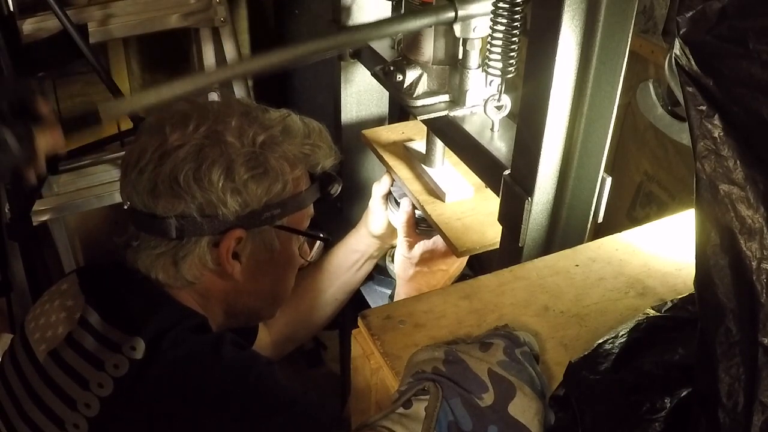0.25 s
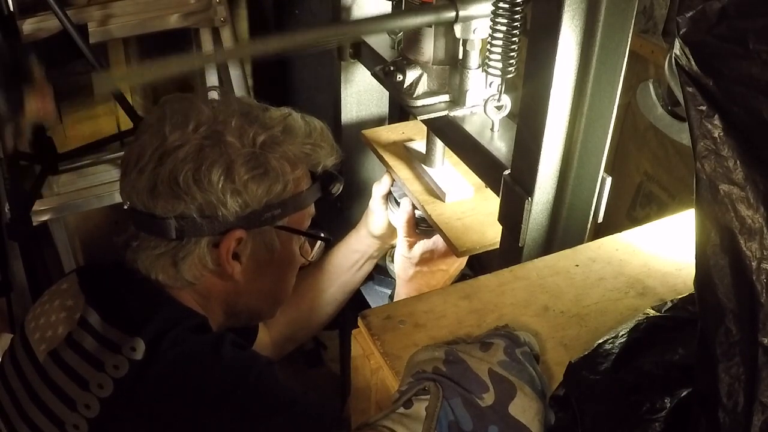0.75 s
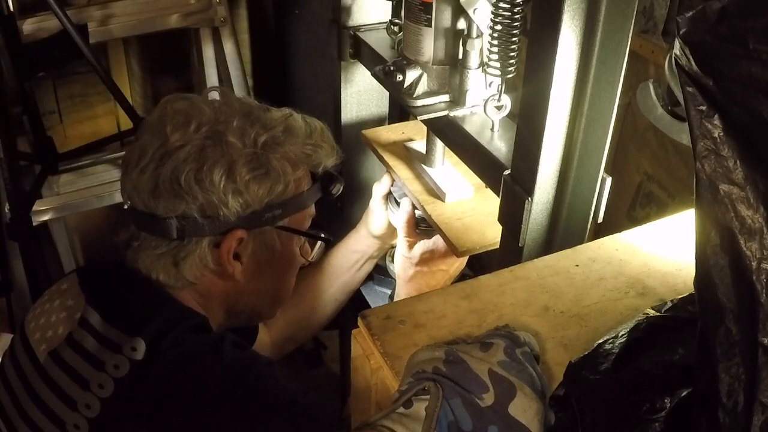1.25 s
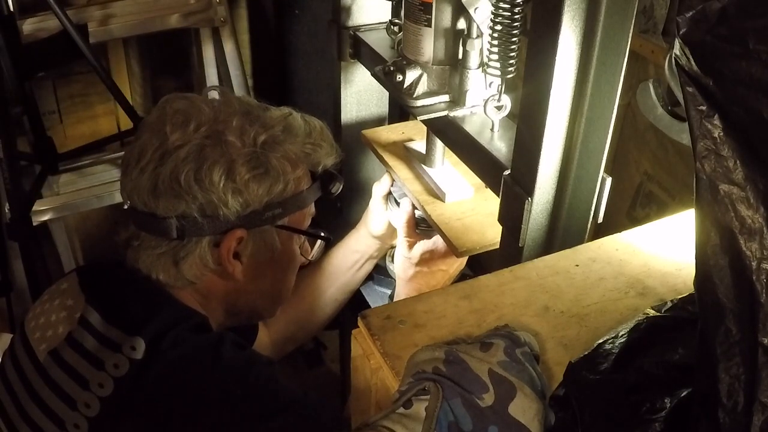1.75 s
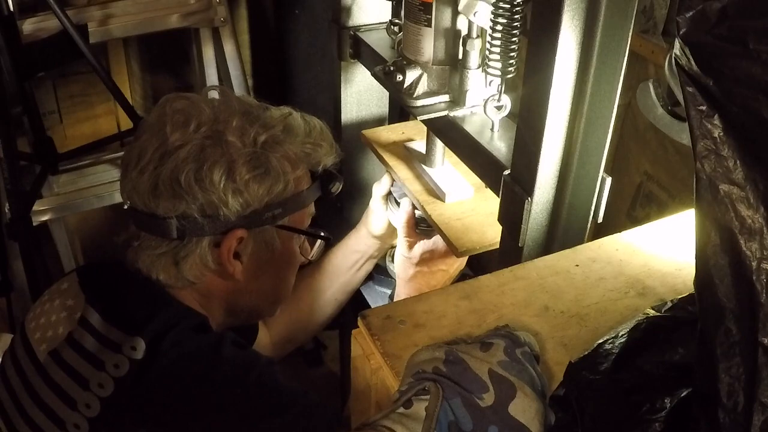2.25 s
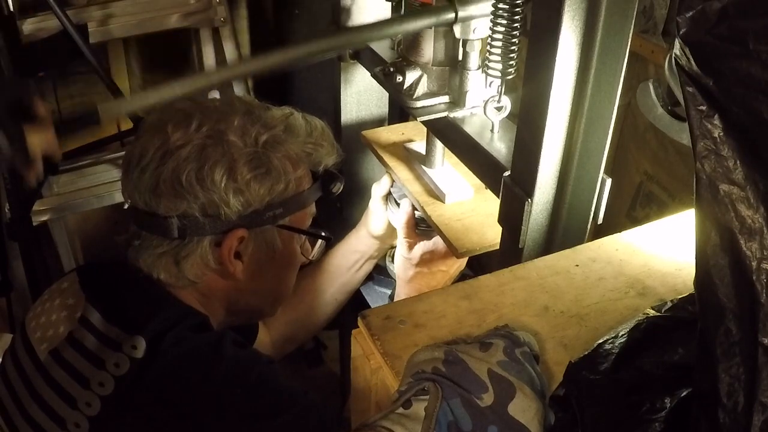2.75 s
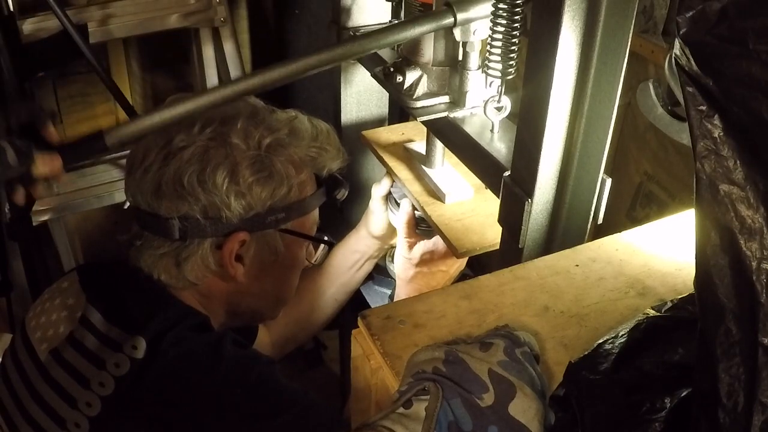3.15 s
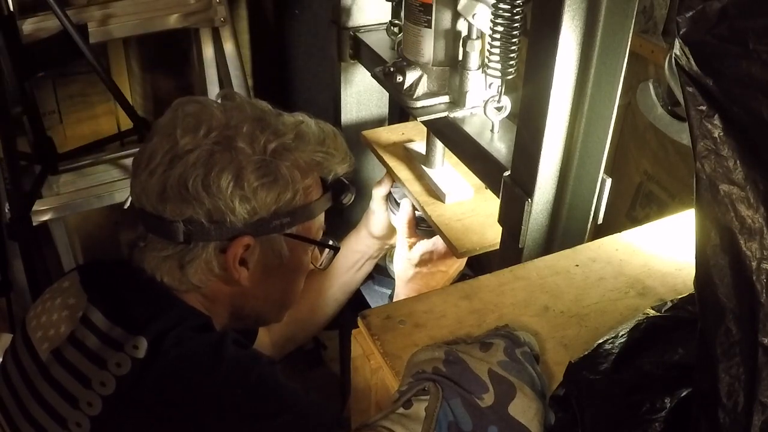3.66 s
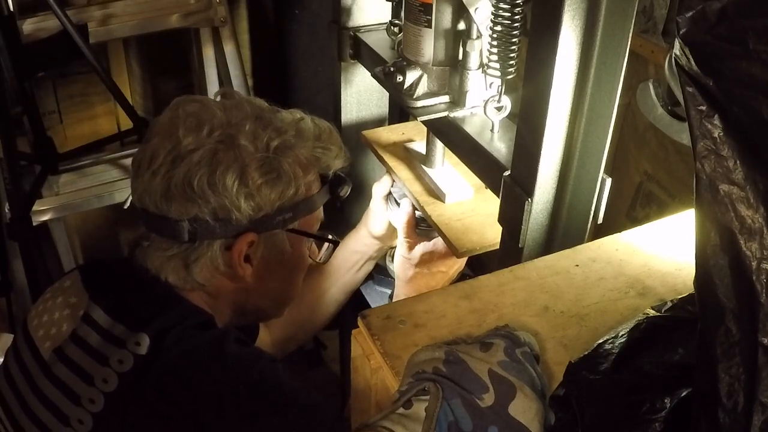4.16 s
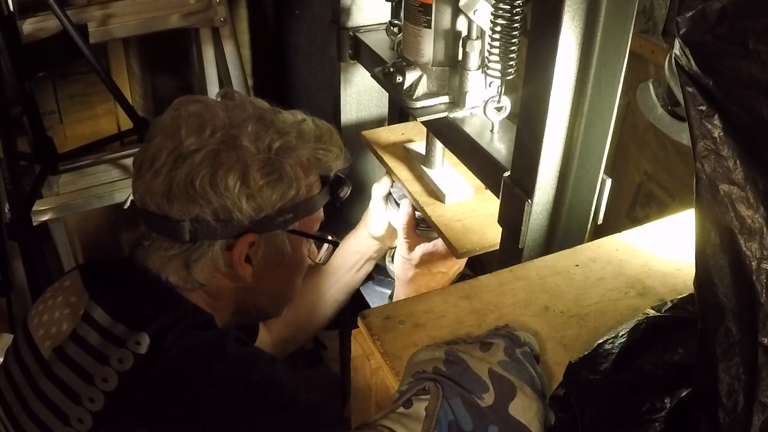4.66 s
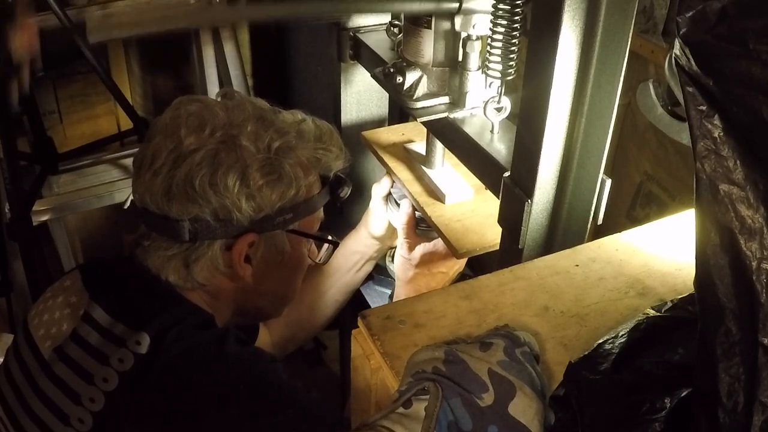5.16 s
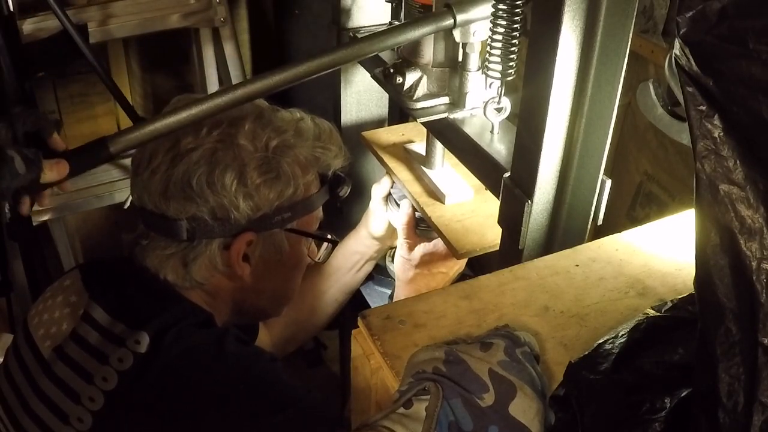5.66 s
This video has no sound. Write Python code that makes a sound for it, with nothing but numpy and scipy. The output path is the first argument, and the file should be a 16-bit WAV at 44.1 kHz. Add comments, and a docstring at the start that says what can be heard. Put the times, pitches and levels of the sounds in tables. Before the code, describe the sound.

Close, slightly boxy sound of a hand-pumped steel press in a quiet workshop, over a steady soft low hum and faint wide hiss. From 0 to 0.2 s comes the end of a stroke: four quick knocks, bright then dull, about 15 per second, and a knock with a low thump near 0.27 s. Light metal clinks cluster at 0.6-0.75 s, with faint taps from 1.2 to 1.7 s. Small knocks and weak thumps at 1.84 and 1.97 s lead into a run of eight double knocks, 2.24-2.75 s, closed by a dull thump at 2.79 s. Bright clinks follow at 3.15-3.3 s, then sparse quiet taps until 4.4 s. A firm knock at 4.72 s starts the loudest run, 4.76-5.25 s, hard and ringing briefly, ending in a sharp knock and the deepest thump at 5.31 s. Last clinks fall at 5.7-5.85 s. Echo is short, dull and faint.

```python
"""Dull and bright knocks in quick runs, low thumps and light clinks stand over a soft workshop background.
They come from a hand-pumped hydraulic press, heard through a boxed-in microphone close to the frame.
On each down stroke the loaded ram sticks and slips, knocking through the steel frame, and the handle lands
on its stop with a low thump; on the way up the loose handle and linkage clink, with small dull knocks.
Short pushes ring steel modes and bands of dying noise; filtered noise makes the background and echo."""
import sys
import numpy as np
from scipy import signal
from scipy.fft import rfft, irfft
from scipy.io import wavfile

SR = 44100
rng = np.random.default_rng(int(sys.argv[2]) if len(sys.argv) > 2 else 0)


def log_audio(samples):
    """Write samples as a 16-bit WAV file to the path given in sys.argv[1]."""
    # one column per channel
    frames = np.atleast_2d(samples).T
    # limit to full scale, then quantise
    limited = np.clip(frames, -1, 1)
    pcm = np.round(limited * 32767).astype(np.int16)
    wavfile.write(sys.argv[1], SR, pcm)


N = 260631

# Contact times below hold near 1100 Hz; strike() keeps them within 0.3 to 12 ms.
# background of the shop: (frequency [Hz], relative density [dB per Hz])
BACKGROUND_SPECTRUM = [(12, 6.5), (20, 4), (38, -8), (77, 2), (150, -15.5), (285, -18), (377, -16.5),
                       (472, -14.5), (780, -16), (849, -6.5), (1030, -42), (1290, -30), (1610, -23),
                       (13900, -26), (16000, -29)]
# resonances of background and echo: (frequency [Hz], width [Hz], level [dB])
BOXY_RESONANCES = [(290, 100, 2), (455.6, 18, -1.5), (618, 3.3, -5.5), (886, 12, -8), (1138, 65, 0),
                   (1233, 6.8, -3.5), (1301.4, 28, -2), (1445, 24, -20.5), (990, 130, -13)]
# noise of opposite sign in the two channels: (frequency [Hz], relative density [dB per Hz])
SIDE_SPECTRUM = [(12, -9), (20, 21), (38, -1), (499, -21.5), (607, -15), (802, -31), (1810, -23),
                 (12100, -21.5), (16000, -61)]
# bright slips of the loaded ram: (time [s], treble drive [dB])
SLIPS = [(0.0014, -57), (0.0539, -49.5), (0.1126, -61.5), (0.181, -63), (2.2421, -49.5), (2.3216, -57),
         (2.387, -49.5), (2.4488, -41.5), (2.5143, -41), (2.5816, -55), (2.652, -59), (2.7249, -53.5),
         (4.756, -54), (4.8769, -46), (4.9441, -42), (5.001, -36.5), (5.0575, -34.5), (5.1105, -35.5),
         (5.1681, -38.5), (5.235, -45.5)]
# the dull catch that ends each slip: (time [s], middle drive [dB])
CATCHES = [(0.02, -38), (0.0776, -40.5), (0.1402, -43.5), (0.2075, -45.5), (2.2745, -41), (2.3497, -43),
           (2.4115, -45), (2.474, -40.5), (2.5375, -42), (2.604, -42), (2.6798, -43.5), (2.7544, -44),
           (4.8048, -40.5), (4.9027, -38.5), (4.9642, -41), (5.0228, -34), (5.0779, -32), (5.1295, -34),
           (5.1835, -38.5), (5.255, -46)]
# lone knocks as the handle takes up play, takes load or stops:
# (time [s], treble drive [dB], middle above treble [dB], top above treble [dB], contact [ms])
KNOCKS = [(0.2636, -53.5, -4, -3.5, 5.5), (1.8261, -69.5, 13, -23, 1.1), (1.8429, -58, 4, -35, 2.5),
          (1.9708, -51, 10.5, -13, 1.7), (2.1321, -71, 18.5, -4, 2.8), (2.187, -61.5, 21.5, -2, 2.7),
          (2.775, -56.5, 7.5, -1, 5.7), (3.0259, -82.5, 7, -30, 8.4), (3.7701, -75, 2, -20, 2.3),
          (3.8363, -76, 5, -20, 6), (4.399, -68.5, 13.5, -43, 3.4), (4.7159, -39.5, 4.5, -3, 2.65),
          (5.3084, -39.5, -4.5, -18, 1.16)]
# modes rung by each knock, mostly of the steel frame; the strong short ring near 1.3 kHz is the boxed-in
# microphone's own: (frequency [Hz], level [dB], t60 [s])
FRAME_MODES = [(273.4, -10, 0.33), (324.3, -4.5, 0.24), (455, -3.5, 0.061), (589, -2, 0.049),
               (669, -13.5, 0.29), (760, 5.5, 0.028), (882.6, 1.5, 0.095), (1117, -5, 0.15),
               (1232, -4.5, 0.064), (1309.6, 12, 0.038), (1330, -14.5, 0.2), (1324, -16, 0.38),
               (1372, 9.5, 0.032), (1448, -6, 0.11), (1633, -2, 0.075), (2306, -13.5, 0.12),
               (2510, -9, 0.17), (2684, -12.5, 0.19), (3224, -14.5, 0.15), (3485, -9, 0.14),
               (3930, -12.5, 0.055), (4190, -11.5, 0.093), (4260, -17.5, 0.069), (4700, -11.5, 0.098),
               (6110, 0, 0.011), (3087, 5, 0.011), (5000, 0, 0.015), (1519, 6, .025), (7040, -27, 0.21)]
# bands of dying noise after each knock, with one long faint band near 1.1 kHz:
# (frequency [Hz], width [Hz], level [dB], t60 [s])
KNOCK_WASH = [(278.6, 140, -9.5, 0.27), (564, 386, 0.5, 0.11), (847.4, 70, -3, 0.088),
              (1280, 220, -19, 0.27), (1106, 570, -31.5, 1.5), (1900, 550, -10, 0.2),
              (2170, 300, -20, 0.088), (2670, 300, -10.5, 0.12), (3310, 440, -10, 0.13),
              (4120, 680, -11.5, 0.16), (4900, 550, -12.5, .1), (6080, 610, -9.5, 0.12),
              (7700, 340, -14.5, 0.057), (9400, 2600, -10.5, 0.076), (13400, 3600, -13.5, 0.13)]
# the press rocks when the handle takes load or meets its stop: (time [s], drive [dB])
THUMPS = [(0.277, -55), (1.841, -58.5), (1.972, -60.5), (2.788, -53), (4.72, -62.5), (5.32, -48)]
# lowest modes of the whole press: (frequency [Hz], level [dB], t60 [s])
THUMP_MODES = [(89.2, -0.5, 0.77), (35, -19, .2), (110, -1, 0.32), (69.6, -29, 0.38)]
# clinks and small dull knocks of handle and linkage: (time [s], treble drive [dB],
# middle above treble [dB], contact [ms], favoured mode [Hz], gain of that mode [dB])
LINKAGE_TOUCHES = [(0.598, -68.5, 11.5, 5.3, 2480, 17), (0.62, -65, 16, 3, 2550, 26),
                   (.625, -53.5, -28, 1.3, 10630, 16), (0.698, -48.5, -6, 4.5, 6185, 25),
                   (.712, -62, 17, 7.4, 11600, 10), (.753, -47, 6.5, .83, 7720, 14),
                   (1.2008, -76, 13, 1.8, 480, 12.5), (1.265, -69.5, 12.5, 6.2, 484, 5.5),
                   (1.389, -80, -17, 3, 9110, 27), (1.599, -71.5, 20, 1.4, 2260, 26),
                   (1.641, -61.5, -5, 2.8, 8850, -4), (1.661, -63, 11, 4.4, 482, 9),
                   (1.695, -60, -5, 5, 3700, 29), (1.861, -78, 25, 4.9, 1135, 22),
                   (3.140, -62.5, 9.5, 8.4, 5000, 15), (3.149, -66, -6, 1.6, 10140, 39),
                   (3.213, -54, 4, 2.3, 6100, -6), (3.222, -50.5, 4.5, 4, 13700, 12),
                   (3.264, -56, 13.5, 1.4, 12100, 11), (3.290, -62, 0.5, 9.4, 10400, 10),
                   (3.846, -82.5, 17.5, 6.8, 480, 11.5), (3.974, -79.5, -21, 4, 8830, 20),
                   (4.072, -92, 13.5, 20, 700, 13), (4.181, -72, 24, 1.1, 2240, 15),
                   (4.241, -55, 10.5, 0.95, 2250, 21), (4.257, -74, 3, 5.9, 590, 26),
                   (4.276, -60.5, 2, 5.3, 2260, 17), (4.412, -75.5, 20.5, 8.6, 700, 18),
                   (5.316, -48.5, -13, 1.5, 1855, 25.5), (5.681, -69, 16, 4.4, 4123, 31),
                   (5.764, -52, 0, 7.3, 14500, 20), (5.798, -48, 3.5, 1.1, 870, 15.5),
                   (5.825, -58, 15.5, 0.72, 850, -4), (5.842, -63, -17, 8.4, 10500, 8)]
# modes of handle and pins: (frequency [Hz], level [dB], t60 [s])
LINKAGE_MODES = [(478.7, -1.5, 0.083), (592.3, -11.5, 0.32), (681.6, -8, 0.14), (880, -15, 0.27),
                 (1150, -30.5, 0.46), (1290, 3, 0.034), (1860, -32.5, 0.82), (2315, -5.5, 0.029),
                 (2528, -13.5, 0.13), (3750, -15.5, 0.054), (3987, -3.5, 0.037), (4900, -2, 0.029),
                 (5990, -5, 0.022), (7000, -20, 0.15), (7990, -5.5, 0.028), (8840, -1.5, 0.035),
                 (10480, -10.5, 0.046), (11600, -13, 0.077), (13700, -6, 0.042), (14600, -30, 0.033)]
# bands of dying noise after each touch: (frequency [Hz], width [Hz], level [dB], t60 [s])
LINKAGE_WASH = [(269, 61, -13, 0.24), (594, 154, -12, 0.24), (940, 560, -11, 0.28), (1368, 150, -12, 0.13),
                (2270, 2370, -3.5, 0.1), (3610, 2700, -6.5, 0.12), (5800, 2200, -2.5, 0.045),
                (7500, 14500, -7, 0.15), (11200, 3700, -8, 0.11), (14100, 1000, -12.5, 0.065)]
# centres of bass, middle, treble and top: (frequency [Hz])
COLOUR_HZ = [350, 1100, 4000, 11000]

BACKGROUND_DB, BOXY_HUM_DB, SIDE_DB = -70.5, -75, -75
SHOP_T60_S, SHOP_DB, SHOP_CUT_HZ, SHOP_BOXY_DB = 1, -24, 5100, -1.5
# a band follows the tabled one: (level [dB] when that stands at the pivot, share of its swing)
PIVOT_DB = -45
SLIP_BASS, SLIP_MIDDLE, SLIP_TOP_DB, SLIP_MS = (-50, 0.6), (-48.5, 0.13), -22.5, 1
CATCH_BASS, CATCH_TREBLE, CATCH_TOP_DB, CATCH_MS = (-50, 0.091), (-59.5, 1), -21, 1.82
# bass above treble, rising with middle and contact
KNOCK_BASS_DB, KNOCK_BASS_SHARE, KNOCK_BASS_DB_PER_MS = 0.5, 0.48, 1.3
# bass against middle: longer touches push the low modes more
TOUCH_BASS_DB, TOUCH_BASS_DB_PER_MS = -13.5, 1.88
# top above treble when the favoured mode is at 5 kHz; higher touches are brighter
TOUCH_TOP_DB, TOUCH_TOP_DB_PER_OCTAVE = -7, 10
PUSH_SAMPLES = 1024
MICROPHONE_STOP_HZ = 16016   # 60 dB down from here up


def from_db(db):
    """Decibels to gain."""
    return 10 ** (np.asarray(db) / 20)


def rms_one(x):
    """Scale to unit rms."""
    return x / np.sqrt(np.mean(x ** 2) + 1e-20)


def at_hz(hz, points_hz, values):
    """Read a table on a log-frequency axis."""
    return np.interp(np.log(hz), np.log(points_hz), values)


def coloured(spectrum):
    """Steady noise with the given spectrum, rms 1."""
    hz = np.maximum(np.fft.rfftfreq(N, 1 / SR), 1)
    gain = from_db(at_hz(hz, *np.transpose(spectrum)))
    white = rng.standard_normal(N)
    return rms_one(irfft(rfft(white) * gain, N))


def ring(force, hz, t60):
    """A damped mode: a unit click sets a sine of height 1 ringing, down 60 dB after t60."""
    radius = from_db(-60 / (t60 * SR))
    angle = 2 * np.pi * hz / SR
    return signal.lfilter([0, np.sin(angle)], [1, -2 * radius * np.cos(angle), radius ** 2], force + 1e-18)


def boxy(x):
    """The resonances that colour everything diffuse, rms 1."""
    return rms_one(sum(from_db(db) * rms_one(ring(x, hz, 2.2 / width)) for hz, width, db in BOXY_RESONANCES))


def background():
    """Broad steady noise with a few noisy resonances standing out."""
    broad = from_db(BACKGROUND_DB) * coloured(BACKGROUND_SPECTRUM)
    return broad + from_db(BOXY_HUM_DB) * boxy(rng.standard_normal(N))


def side_hiss():
    """Noise of opposite sign left and right gives the background its width."""
    return from_db(SIDE_DB) * coloured(SIDE_SPECTRUM) * np.array([[1], [-1]])


def strike(events, modes, wash, spread_db, grit, shiver_db, haste):
    """Each contact is a short push into all modes, with a shiver of loose parts and a dying wash."""
    rows = np.array(events)
    count = len(rows)
    start_s, treble_db, bass_db, middle_db, top_db, contact_ms = rows[:, :6].T
    contact_ms = np.clip(contact_ms, 0.3, 12)
    colours = np.transpose([treble_db + bass_db, treble_db + middle_db, treble_db, treble_db + top_db])
    step = np.arange(PUSH_SAMPLES)
    where = (np.round(start_s * SR).astype(int)[:, None] + step).ravel()

    def push(hz):
        """High modes are pushed faster, low ones build up for longer; each push has unit energy."""
        age = step / (contact_ms[:, None] * SR / 1000) * (hz / 1100) ** haste
        shape = age * np.exp(-2 * age)
        return shape / np.sqrt(np.sum(shape ** 2, axis=1, keepdims=True))

    def train(hz, shapes, level_db):
        """All contacts as felt at one frequency."""
        db = np.array([at_hz(hz, COLOUR_HZ, colour) for colour in colours]) + level_db
        pushes = from_db(db)[:, None] * shapes
        return np.bincount(where, pushes.ravel(), N + PUSH_SAMPLES)[:N]

    out = np.zeros(N)
    shiver = from_db(shiver_db - 1500 * step / SR)   # falls 1500 dB per second
    for hz, level_db, t60 in modes:
        turn = np.exp(2j * np.pi * hz / SR * step)
        rough = grit * rng.standard_normal((count, PUSH_SAMPLES))
        force = push(hz) * (turn.real + rough)
        # every push reaches its mode with the same strength, however rough
        force /= np.abs(force @ turn)[:, None] + 1e-9
        force += shiver * rng.standard_normal(force.shape)
        caught_db = level_db + spread_db * rng.standard_normal(count)
        if rows.shape[1] > 6:
            # where the blow lands favours one mode
            favoured_hz, gain_db = rows[:, 6], rows[:, 7]
            caught_db += gain_db * np.exp(-(np.log(hz / favoured_hz) / 0.04) ** 2)
        out += ring(train(hz, force, caught_db), hz, t60)

    white = rng.standard_normal((2, N))   # neighbouring bands draw on different noise
    for k, (hz, width, level_db, t60) in enumerate(wash):
        caught_db = level_db + spread_db * rng.standard_normal(count)
        power = train(hz, push(hz), caught_db) ** 2
        fade = from_db(-120 / (t60 * SR))   # power, so twice the decibels of amplitude
        envelope = np.sqrt(signal.lfilter([1], [1, -fade], power + 1e-18))
        edges_hz = [hz - width / 2, hz + width / 2]
        band = signal.butter(2, edges_hz, "band", fs=SR, output="sos")
        # a narrow band passes less noise, so it is raised to match
        out += signal.sosfilt(band, envelope * white[k % 2]) * np.sqrt(SR / 2 / width)
    return out


def follow(rule, db):
    """Level of a band that swings with the tabled one."""
    pivot_level_db, share = rule
    return pivot_level_db + share * (db - PIVOT_DB)


def slip_contacts():
    """The loaded ram breaks free: time, treble, then bass, middle, top above treble, and contact."""
    s, treble_db = np.transpose(SLIPS)
    bass_db = follow(SLIP_BASS, treble_db) - treble_db
    middle_db = follow(SLIP_MIDDLE, treble_db) - treble_db
    same = np.ones(len(s))
    return np.transpose([s, treble_db, bass_db, middle_db, SLIP_TOP_DB * same, SLIP_MS * same])


def catch_contacts():
    """The ram sticks again with a dull, longer contact, in the same columns."""
    s, catch_db = np.transpose(CATCHES)
    treble_db = follow(CATCH_TREBLE, catch_db)
    bass_db = follow(CATCH_BASS, catch_db) - treble_db
    same = np.ones(len(s))
    return np.transpose([s, treble_db, bass_db, catch_db - treble_db, CATCH_TOP_DB * same, CATCH_MS * same])


def lone_knock_contacts():
    """The handle takes up play, takes load or stops; longer contacts carry more bass."""
    s, treble_db, middle_db, top_db, contact_ms = np.transpose(KNOCKS)
    bass_db = KNOCK_BASS_DB + KNOCK_BASS_SHARE * middle_db + KNOCK_BASS_DB_PER_MS * contact_ms
    return np.transpose([s, treble_db, bass_db, middle_db, top_db, contact_ms])


def frame_knocks():
    """Slips, catches and lone knocks ring the steel frame and leave bands of dying noise."""
    contacts = np.vstack([slip_contacts(), catch_contacts(), lone_knock_contacts()])
    return strike(contacts, FRAME_MODES, KNOCK_WASH, spread_db=3, grit=0.25, shiver_db=-38, haste=0.6)


def shop(x):
    """Dull diffuse echo of walls and shelves, from 6 ms on, coloured by the background's resonances."""
    t = np.arange(SR) / SR
    noise = rng.standard_normal(SR)
    dull = rms_one(signal.sosfilt(signal.butter(1, SHOP_CUT_HZ, fs=SR, output="sos"), noise))
    diffuse = dull + from_db(SHOP_BOXY_DB) * boxy(noise)
    tail = diffuse * from_db(-60 * t / SHOP_T60_S) * (t > 0.006)
    return signal.fftconvolve(x, tail / np.sqrt(np.sum(tail ** 2)))[:N]


def thumps():
    """The whole press rocks on the floor: a soft push into its lowest modes."""
    s, db = np.transpose(THUMPS)
    clicks = np.bincount(np.round(s * SR).astype(int), from_db(db), N)
    force = signal.sosfilt(signal.butter(2, 90.0, fs=SR, output="sos"), clicks + 1e-18)
    return sum(ring(from_db(level_db) * force, hz, t60) for hz, level_db, t60 in THUMP_MODES)


def linkage_touches():
    """Clinks and small dull knocks of handle and linkage, each favouring one frequency."""
    s, treble_db, middle_db, contact_ms, mode_hz, gain_db = np.transpose(LINKAGE_TOUCHES)
    bass_db = middle_db + TOUCH_BASS_DB + TOUCH_BASS_DB_PER_MS * contact_ms
    octaves = np.log2(np.clip(mode_hz, 1500, 10000) / 5000)
    top_db = TOUCH_TOP_DB + TOUCH_TOP_DB_PER_OCTAVE * octaves
    contacts = np.transpose([s, treble_db, bass_db, middle_db, top_db, contact_ms, mode_hz, gain_db])
    return strike(contacts, LINKAGE_MODES, LINKAGE_WASH, spread_db=2.5, grit=0.6, shiver_db=-33, haste=0.12)


def scene():
    """Press in the centre, close by, with its room echo over the wider background."""
    steel = frame_knocks() + linkage_touches()
    # deep bass is cut from knocks and clinks
    press = signal.sosfilt(signal.butter(2, 140.0, "high", fs=SR, output="sos"), steel)
    centre = press + from_db(SHOP_DB) * shop(press) + thumps() + background()
    return centre + side_hiss()


def record(dry):
    """The top is cut steeply."""
    return signal.sosfilt(signal.cheby2(14, 60, MICROPHONE_STOP_HZ, fs=SR, output="sos"), dry)


dry = scene()
out = record(dry)
log_audio(out)
```